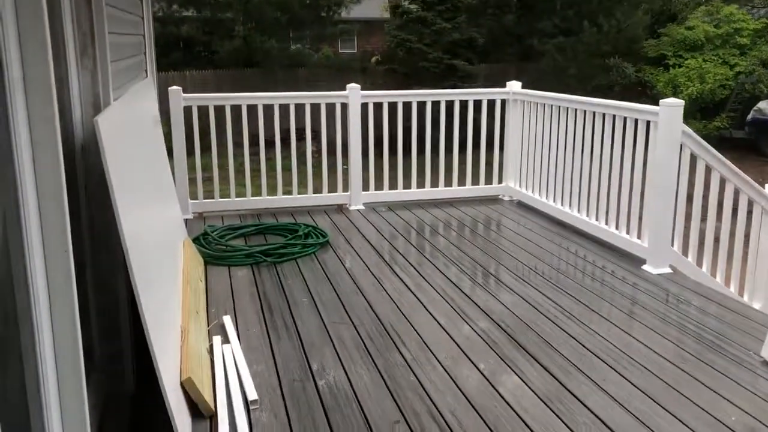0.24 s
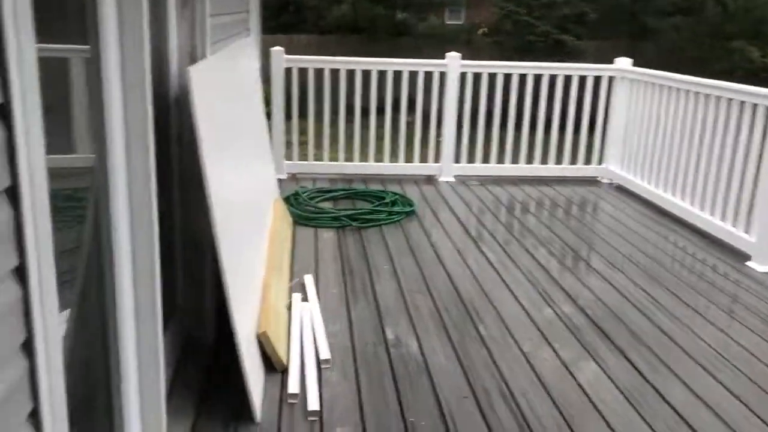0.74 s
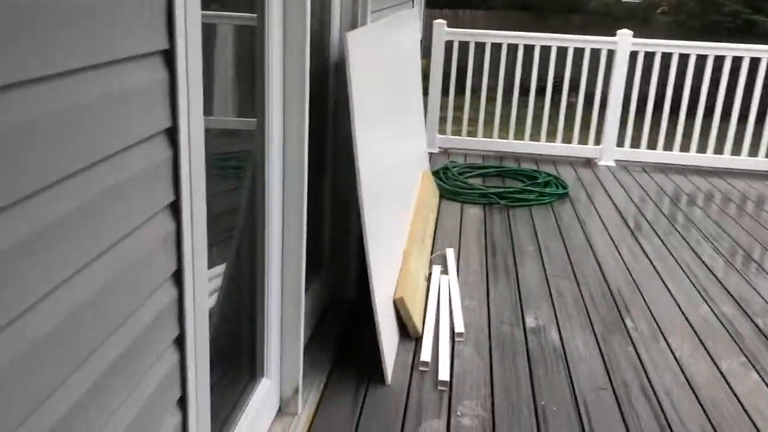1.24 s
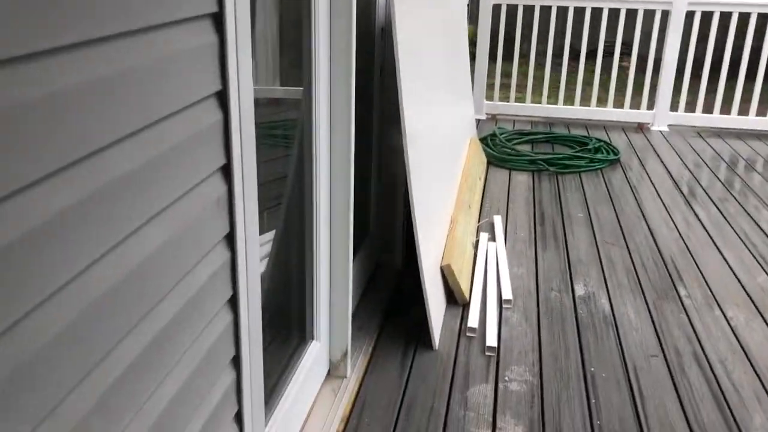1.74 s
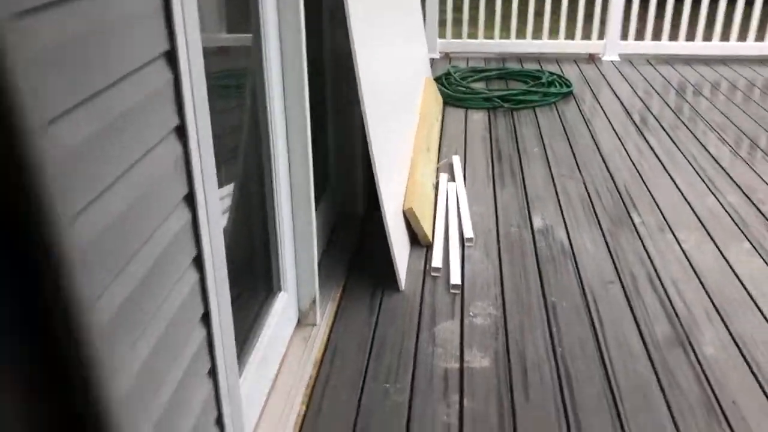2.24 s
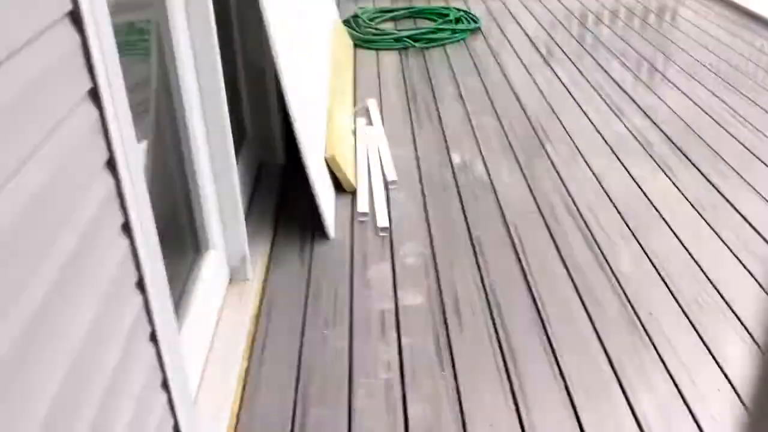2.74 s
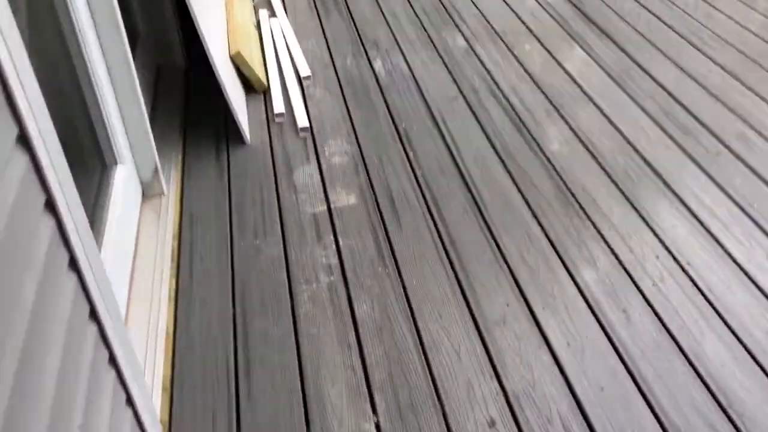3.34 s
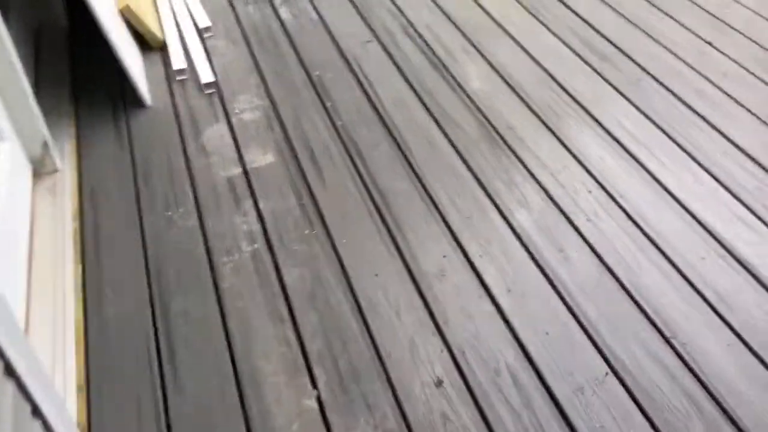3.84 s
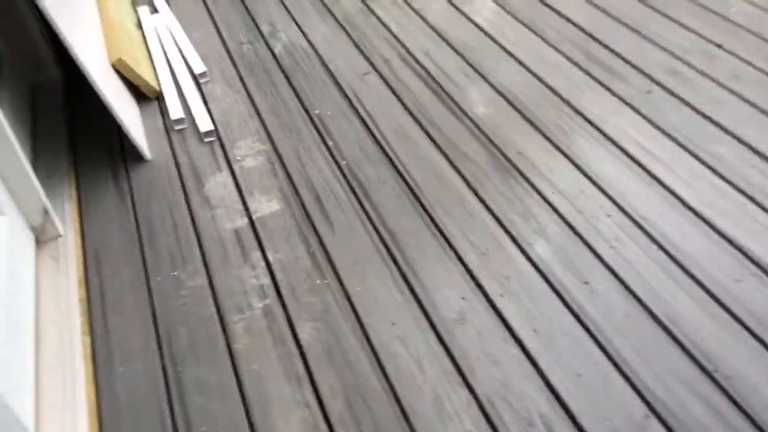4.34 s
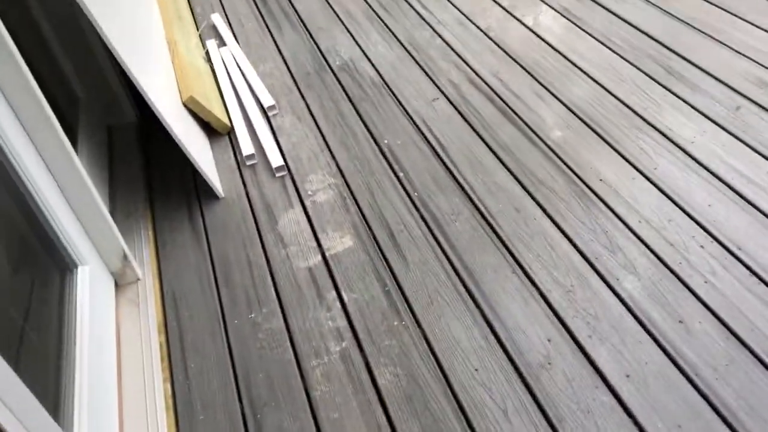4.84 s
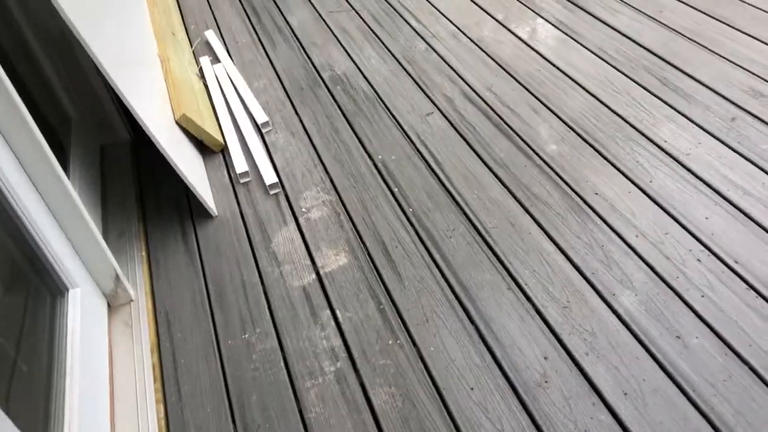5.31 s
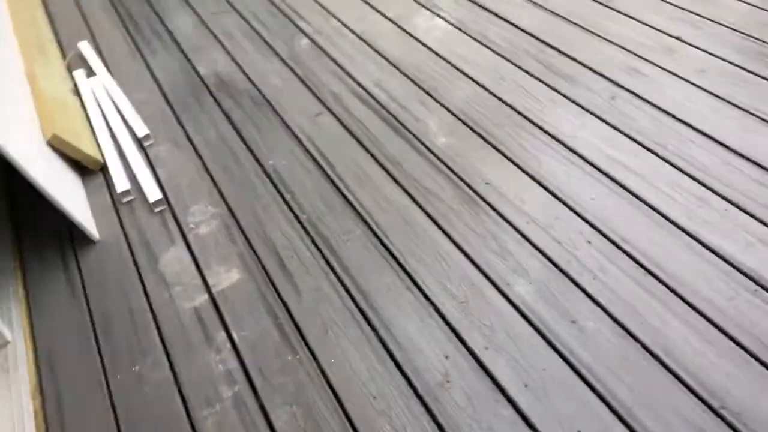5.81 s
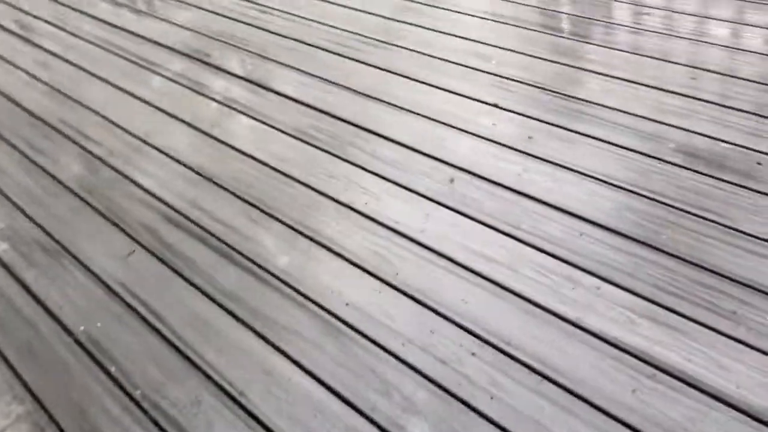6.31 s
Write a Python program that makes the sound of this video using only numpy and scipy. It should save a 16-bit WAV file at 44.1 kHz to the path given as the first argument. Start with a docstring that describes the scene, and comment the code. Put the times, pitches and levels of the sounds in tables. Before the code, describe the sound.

A sliding glass door cracks off its latch, booms, rumbles along its track and squeals to a stop; then a bird clucks in a quiet yard.

```python
"""Shoes scuff and clothes rustle by the phone over a quiet suburban yard, with small clicks from a glass patio door.
Cracks and thumps then ring the panel as the door is pulled off its latch: short noise bursts and decaying sines.
It rumbles open on its rollers (filtered impact grains) and squeals as it slows (unsteady tones with overtones).
A bird outside gives ten clucks from paired gliding voices; a farther one whistles thinly.
Traffic murmur and leaves are shaped noise."""
import sys
import numpy as np
from scipy import signal
from scipy.fft import rfft, irfft
from scipy.io import wavfile
from scipy.ndimage import uniform_filter1d

SR = 44100
rng = np.random.default_rng(int(sys.argv[2]) if len(sys.argv) > 2 else 0)


def dump_mix(stems):
    """Bounce the given channels to the path in sys.argv[1] as a 16-bit WAV at rate SR."""
    frames = np.atleast_2d(stems).T  # one column per channel
    limited = np.clip(frames, -1, 1)  # hard clip at full scale
    pcm = np.round(limited * 32767).astype(np.int16)
    wavfile.write(sys.argv[1], SR, pcm)


N = 289464
T = np.arange(N) / SR  # time of each sample [s]

# Levels in the tables are relative: each source is balanced again in its own mix.
# latch and frame snapping: (time [s], level [dB], pitch of the contact [Hz])
SNAPS = [(1.134, -23.5, 2010), (1.137, -19, 4520), (1.141, -14.5, 4720), (1.146, -24, 2200),
         (1.15, -5, 1775), (1.152, -19, 4540), (1.17, -26.5, 1750), (1.189, -44, 4600), (1.1935, -21, 4100),
         (1.3170, -22, 3050), (1.331, -27.5, 3560), (1.347, -29, 2930)]
# jolts of the heavy panel: (time [s], level [dB])
THUMPS = [(1.1371, -17.5), (1.1507, -19), (1.1698, -21.5), (1.3140, -20), (1.3240, -22), (1.378, -31.5),
          (1.725, -36.5)]
# colour of the latch cracks: (frequency [Hz], level [dB])
CRACK_SPECTRUM = [(150, -19), (500, -5), (1200, 2), (1550, 3), (1800, 3), (2200, -5), (4500, -2),
                  (7000, -7), (11000, -12), (16000, -23.5)]
# modes of the glazed panel: (frequency [Hz], level [dB], 60 dB decay time [s])
PANEL_MODES = [(83.3, -20, 0.73), (138.4, -5.5, 0.51), (158.9, -17.5, 1), (194.4, -4, 0.14),
               (215, 3, 0.099), (257.4, -3, 0.11), (318.6, -11.5, 0.19), (656, -15, 0.14), (986, -31, 0.16),
               (1203, -23, 0.32), (1780, -29, 0.45)]
# ring of the room behind the door: (frequency [Hz], level [dB])
ROOM_SPECTRUM = [(59, -31), (100, -9), (200, 0), (425, -15.5), (674, -12.5), (814, -15), (962, -12),
                 (1770, -15), (2420, -21.5), (4940, -24), (15000, -45.5)]
# rumble following the door's speed, a quick shove, a long coast, a stop: (time [s], level [dB])
ROLL_CURVE = [(1.82, -54.5), (1.98, -44), (2.189, -28.5), (2.48, -29), (2.9, -37.5), (3.15, -46),
              (3.43, -44.5), (3.569, -56.5)]
# colour of the rolling panel: (frequency [Hz], level [dB])
RUMBLE_SPECTRUM = [(21, -48), (35, -11), (70, 1.5), (125, -3), (169, 0), (221, -0.5), (271, 1), (443, -5),
                   (491, -1), (543, -7.5), (918, -9.5), (1220, -15), (2000, -23), (2600, -62), (4400, -120)]
# colour of the grit in the track: (frequency [Hz], level [dB])
GRIT_SPECTRUM = [(900, 4.5), (1600, 2), (2600, 2), (4500, -2.5), (7000, -10.5), (10000, -16),
                 (15500, -19.5)]
# rollers dropping over bumps in the track: (time [s], level [dB])
BUMPS = [(1.867, -38), (1.965, -28), (1.987, -21), (2.068, -23), (2.183, -17), (2.209, -32)]
# squeal of the slowing door, before hops and judder: (time [s], pitch [Hz], level [dB])
SQUEAL_CURVE = [(2.819, 2880, -43.5), (2.899, 3265, -36.5), (2.985, 3330, -36), (3.003, 3040, -35.5),
                (3.125, 3094, -35.5), (3.148, 3565, -37.5), (3.2, 3814, -37), (3.249, 3930, -41.5),
                (3.267, 4600, -46.5), (3.355, 4260, -44), (3.41, 3450, -34), (3.476, 2360, -48)]
# brief squeaks, before judder: (time [s], length [s], start pitch [Hz], end pitch [Hz], level [dB])
SQUEAKS = [(2.214, 0.077, 3250, 6540, -43), (2.285, 0.1, 6330, 4660, -40.5),
           (2.364, 0.076, 4380, 7060, -42), (2.59, 0.039, 3660, 6240, -40.5),
           (2.699, 0.075, 5700, 6200, -52.5), (3.473, 0.056, 3860, 2650, -46)]
# small clicks of handle, latch and track: (time [s], level [dB], centre [Hz])
TICKS = [(0.742, -39.5, 6200), (0.8248, -36, 2980), (.8471, -36, 4670), (0.861, -30, 4330),
         (.875, -44, 4670), (1.02, -35, 8200), (1.045, -36.5, 3160), (1.6403, -45.5, 6560),
         (1.793, -38, 6250), (2.2225, -21.5, 2810), (2.4907, -25.5, 4220), (2.6343, -27.5, 4520),
         (2.7284, -25, 3970), (2.859, -33, 4070), (3.3083, -24, 2820), (4.191, -47, 5460),
         (4.1978, -37, 5920), (5.3125, -43, 5900), (5.537, -34, 2600), (6.1047, -39, 3820),
         (6.117, -31.5, 2300), (6.2477, -35, 1080)]
# bird clucks: (time [s], top of the high voice before its shake [Hz], level [dB])
CLUCKS = [(4.108, 3230, -62.5), (4.263, 3600, -56.5), (4.400, 3570, -51.5), (4.529, 3700, -50.5),
          (4.646, 3620, -47.5), (4.767, 3450, -48), (4.902, 3590, -48), (5.039, 3670, -50),
          (5.184, 3700, -49), (5.338, 3590, -51.5)]
# noisy edge of a cluck, with the phone's own harsh ring near 13 kHz: (frequency [Hz], level [dB])
RASP_SPECTRUM = [(2000, 2), (2800, 4.5), (4500, -6.5), (7000, -15), (10500, -38), (12900, -13),
                 (14500, -21)]
# thin whistles of a farther bird: (time [s], length [s], start pitch [Hz], end pitch [Hz], level [dB])
WHISTLES = [(4.36, 0.37, 3890, 3770, -65), (4.42, .2, 6590, 6460, -72), (4.973, 0.1, 3800, 3950, -62),
            (5.032, 0.029, 4360, 4640, -53.5), (5.002, 0.036, 8460, 8780, -61.5),
            (5.066, 0.19, 6480, 6250, -71)]
# movements by the phone: (time [s], rise [s], hold [s], scuff level [dB], cloth hiss level [dB])
MOVES = [(-.16, 0.18, 0.034, -45.5, -62), (0.571, 0.033, 0.21, -50.5, -64),
         (0.843, .015, 0.022, -44.5, -77), (0.965, 0.027, 0.097, -58, -73), (4.72, 0.11, 0.31, -65, -69.5),
         (5.336, 0.12, 0.16, -43, -63), (5.906, 0.017, 0.12, -58, -54.5), (6.076, 0.027, 0.06, -57, -64),
         (6.24, 0.0046, .04, -54, -69), (6.36, .02, 0.21, -56, -67)]
# colour of the shoe scuffs: (frequency [Hz], level [dB])
SCUFF_SPECTRUM = [(47, -30), (80, -11), (188, 1), (255, -4), (285, 2), (355, -6.5), (627, -7), (684, -10.5),
                  (833, -7.5), (1720, -14.5), (1960, -18.5), (2180, -20), (4500, -22.5), (15000, -47)]
# colour of the sliding fabric: (frequency [Hz], level [dB])
CLOTH_SPECTRUM = [(1500, -15), (3000, -1.5), (5000, -2), (7500, -3), (12000, -9.5), (15500, -12)]
# weight shifting on the boards: (time [s], level [dB], pitch [Hz])
FOOTFALLS = [(.694, -31.5, 236), (0.739, -32.5, 208), (.882, -34.5, 170), (5.451, -40, 280),
             (5.794, -36.5, 216), (5.904, -35, 199)]
# rubbing strokes of sole and sleeve, and one rasp of the door on its track:
# (time [s], length [s], resonance [Hz], sharpness [Q], level [dB])
RUBS = [(0, 0.093, 610, 5, -47), (0.12, 0.16, 640, 3.4, -60.5), (2.165, 0.14, 3360, 1.2, -46.5),
        (5.326, 0.38, 4650, 1.9, -57)]
# colour of the open yard: (frequency [Hz], level [dB])
YARD_SPECTRUM = [(15, -4), (25, -16.5), (71, -1.5), (122, -5), (204, -5.5), (246, -7.5), (331, -15),
                 (368, -12.5), (469, -13), (631, -11.5), (684, -12.5), (1080, -9.5), (1950, -20),
                 (5010, -31), (15500, -54.5)]
# the open air as the phone leans out of the doorway: (time [s], level [dB])
OPEN_AIR_CURVE = [(0, -5), (.5, -8.5), (1.699, -4), (3.6, -0.5), (5.801, 1), (6.56, -3.5)]

# drumming: level against the rumble [dB], and its fade as the door travels [dB/s]
DRUM_DB, DRUM_FADE_DB_PER_S = -1.5, 11
# grit: relative level at full speed [dB], and its change per dB of rumble
GRIT_DB, GRIT_FOLLOW = -46, 0.59
# judder scale, as a share of the pitch, at a reference pitch [Hz]; higher squeals hold steadier
JUDDER, JUDDER_AT_HZ, JUDDER_POWER = 0.01406, 3100, 2.49
# pitch hops up or down, as a share at the same reference pitch, and rate of fresh draws [1/s]
HOP, HOPS_PER_S = 0.0162, 70
# a second, scraping contact: judder scale as a share, and level against the squeal [dB]
FRAY, FRAY_DB = .06, -11
# stray clicks: average rate [1/s], relative level [dB], centre [Hz]
FAINT_TICKS_PER_S, FAINT_TICK_DB, FAINT_TICK_HZ = 3, -45, 6000
# loudest cluck: length [s] and top of its low voice [Hz]; softer clucks are shorter, their low voice lower
CLUCK_S, LOW_VOICE_HZ = .063, 2312
CLUCK_S_PER_DB, LOW_VOICE_HZ_PER_DB = .001, 17
WALL_S, WALL_DB = 0.023, -6.5  # slap of the house wall: delay [s], level before the echo mix [dB]
# movement: depth of the swell [dB], loss during the hold [dB], fall time per rise time
MOVE_RANGE_DB, MOVE_SAG_DB, MOVE_FALL = 19, 4, 1.65
YARD_DB = -51  # yard noise before the murmur and open-air changes [dB]
# far traffic: level against the yard noise [dB], and its one swell: centre [s], width [s], height [dB]
MURMUR_DB, SWELL_AT_S, SWELL_WIDTH_S, SWELL_DB = -1.5, 4.5, 0.62, 5.5
HISS_DB = -77  # steady microphone hiss, before the phone's filters [dB]
TOP_HZ = 15850  # top of the phone's range [Hz]


def undb(db):
    """Decibels to gain."""
    return 10 ** (np.asarray(db) / 20)


def unit(x):
    """Scale to rms 1."""
    return x / np.sqrt(np.mean(x ** 2))


def add(out, s, x):
    """Mix x into out from time s."""
    i = int(s * SR)
    out[i:i + len(x)] += x[:max(N - i, 0)]


def fader(s, db):
    """Gain along a level curve, closed softly outside it."""
    curve_db = np.interp(T, s, db, left=-150, right=-150)
    return uniform_filter1d(undb(curve_db), size=400)


def colour(x, points):
    """Causal minimum-phase filter with the given (Hz, dB) spectrum, rolled off beyond both ends."""
    hz, db = np.transpose(points)
    size = 8192
    f = np.maximum(np.arange(size // 2 + 1) * SR / size, 1)
    octaves_below = np.log2(hz[0] / f).clip(0, 2)
    octaves_above = np.maximum(np.log2(f / hz[-1]), 0)
    level_db = np.interp(np.log(f), np.log(hz), db) - 24 * octaves_below - 24 * octaves_above
    # folding the cepstrum puts the filter's energy as early as it can be
    cepstrum = irfft(np.log(undb(level_db)))
    cepstrum[1:size // 2] *= 2
    cepstrum[size // 2 + 1:] = 0
    impulse = irfft(np.exp(rfft(cepstrum)))
    return signal.fftconvolve(x, impulse)[:len(x)]


def resonance(x, hz, q):
    """One resonance, gain 1 at its centre."""
    b, a = signal.iirpeak(min(hz, SR / 3), max(q, 1), fs=SR)
    return signal.lfilter(b, a, x)


def butter(x, order, hz, kind="low"):
    """Forward Butterworth filter."""
    return signal.sosfilt(signal.butter(order, hz, kind, fs=SR, output="sos"), x)


def walk(rate):
    """Smooth random wander with fresh draws at the given rate, spread near 1."""
    k = max(int(SR / rate), 2)
    steps = np.repeat(rng.standard_normal(N // k + 1), k)
    return unit(uniform_filter1d(steps, k)[:N])


def grains(rate, spread_db):
    """Dense tiny impacts of uneven size, rms 1."""
    size = undb(spread_db * np.minimum(rng.exponential(size=N), 5))
    hits = rng.random(N) < rate / SR
    return unit(hits * size * rng.standard_normal(N))


def fade(t, t60):
    """Exponential ring-down, 60 dB in t60 seconds."""
    return np.exp(-np.log(1000) * t / t60)


def echo(x, t60, delay):
    """Diffuse reflections of x through a decaying noise tail of unit energy."""
    t = T[:SR]
    tail = rng.standard_normal(SR) * fade(t, t60) * (t > delay)
    return signal.fftconvolve(x, tail / np.linalg.norm(tail))[:N]


def contact(hz, t60, q, broad, tone):
    """A short burst of crowded modes, with one clear mode at hz."""
    t = T[:SR // 10]
    noise = rng.standard_normal(len(t))
    crowd = unit(resonance(noise, hz, q) + broad * noise)
    burst = (crowd + tone * np.sin(2 * np.pi * hz * t)) * fade(t, t60)
    # energy grows with ring time
    return burst / np.linalg.norm(burst) * np.sqrt(t60 * SR / 100)


def knocks():
    """The latch lets go in a cluster of cracks; the glazed panel booms and the room rings on."""
    cracks, pushes, t = np.zeros(N), np.zeros(N), T[:SR]
    for s, crack_db, hz in SNAPS:
        add(cracks, s, undb(crack_db) * contact(hz, t60=0.024, q=2.9, broad=0.69, tone=0.43))
    for s, thump_db in THUMPS:
        add(pushes, s, undb([thump_db]))
    ring = sum(undb(db) * np.cos(2 * np.pi * hz * t) * fade(t, t60) for hz, db, t60 in PANEL_MODES)
    soft_onset = 1 - np.exp(-t / 0.0022)
    boom = undb(-4.5) * signal.fftconvolve(pushes, ring * soft_onset)[:N]
    boom = boom + undb(-9.5) * echo(boom, t60=.75, delay=.02)
    # loose glass and screen keep chattering, so the tail is ever-changing
    chatter_decay = fade(t, t60=0.53) * (t > .006)
    chatter_power = np.abs(signal.fftconvolve(cracks ** 2, chatter_decay)[:N]) / SR
    chatter_noise = unit(colour(grains(rate=6000, spread_db=0.5), ROOM_SPECTRUM))
    chatter = undb(8.5) * np.sqrt(chatter_power) * chatter_noise
    room = undb(14) * colour(echo(cracks, t60=1.0, delay=0.002), ROOM_SPECTRUM)
    return undb(10.5) * colour(cracks, CRACK_SPECTRUM) + boom + chatter + room


def rollers():
    """Rollers rattle the panel over a gritty track; the heavy glass drums underneath."""
    s, rumble_db = np.transpose(ROLL_CURVE)
    deep_db = rumble_db + DRUM_DB - DRUM_FADE_DB_PER_S * (s - s[0])
    grit_db = GRIT_DB + GRIT_FOLLOW * (rumble_db - rumble_db.max())
    shake = colour(grains(rate=6000, spread_db=1.5), RUMBLE_SPECTRUM) * undb(.6 * walk(40))
    deep = unit(butter(shake, 4, 125))
    light = unit(butter(shake, 4, 160, "high"))
    grit = unit(colour(grains(rate=5000, spread_db=2.8), GRIT_SPECTRUM))
    grit = grit * undb(1.5 * walk(90) + 1.2 * walk(22))
    # each bump rings the lowest panel mode
    bumps, t = np.zeros(N), T[:SR // 2]
    for at, db in BUMPS:
        add(bumps, at, undb(db) * np.sin(2 * np.pi * PANEL_MODES[0][0] * t) * fade(t, t60=0.17))
    return (light * fader(s, rumble_db) + undb(-2.5) * deep * fader(s, deep_db)
            + undb(3.0) * grit * fader(s, grit_db) + undb(-4.5) * bumps)


def stick_slip(hz, jitter, second_db, third_db, fourth_db):
    """An unsteady friction tone with three overtones that come and go; fast flutter frays each into a scrape."""
    judder = jitter * (.9 * walk(150) + 1.2 * walk(1100))
    phase = 2 * np.pi * np.cumsum(hz * (1 + judder)) / SR
    flutter = undb(2.5 * walk(140))
    tone = np.zeros(N)
    for k, db in enumerate((0, second_db, third_db, fourth_db), 1):
        level = undb(db + 1.3 * k * walk(80))
        fray = 1 + .13 * k * walk(1500)
        in_range = k * hz < TOP_HZ
        tone += level * fray * np.sin(k * phase) * in_range
    return flutter * tone


def squeal():
    """The runner catches in short squeaks, then sings and scrapes as the door slows."""
    s, hz, db = np.transpose(SQUEAL_CURVE)
    note = np.interp(T, s, hz)
    unrest = (JUDDER_AT_HZ / note) ** JUDDER_POWER
    note = note * (1 + HOP * unrest * np.sign(walk(HOPS_PER_S)))  # the pitch catches and hops
    clear = stick_slip(note, JUDDER * unrest, second_db=-13, third_db=-27, fourth_db=-34)
    scrape = stick_slip(note, FRAY, second_db=-15.5, third_db=-23, fourth_db=-36)
    song = (clear + undb(FRAY_DB) * scrape) * fader(s, db)
    # the metal track favours the overtones that cross its ring
    song = song + undb(4.5) * resonance(song, hz=8550, q=5.7)
    pitch, gain = np.full(N, hz[0]), np.zeros(N)
    for at, length, start_hz, end_hz, level_db in SQUEAKS:
        glide = np.interp(T, [at, at + length], [start_hz, end_hz])
        pitch = np.where(T >= at, glide, pitch)
        gain = np.maximum(gain, fader([at, at + length], [level_db, level_db]))
    squeaks = gain * stick_slip(pitch, jitter=.04, second_db=-22, third_db=-32, fourth_db=-35)
    direct = song + squeaks
    return direct + undb(-12) * echo(direct, t60=.4, delay=.005)


def ticks():
    """Light clicks of loose metal and plastic, with randomly timed strays among them."""
    out = np.zeros(N)
    for s, db, hz in TICKS:
        add(out, s, undb(db) * contact(hz, t60=0.019, q=2.8, broad=0.033, tone=0.69))
    strays = (rng.random(N) < FAINT_TICKS_PER_S / SR) * rng.uniform(0.71, 1, N)
    stray_click = contact(FAINT_TICK_HZ, t60=0.016, q=1.4, broad=0.45, tone=.3)
    out += undb(FAINT_TICK_DB) * signal.fftconvolve(strays, stray_click)[:N]
    return out + undb(-8.0) * echo(out, t60=1.0, delay=0.0038)


def bird():
    """Both sides of the syrinx sound at once, each in its own arch, with a rasp; house and trees echo the cluck."""
    out, effort = np.zeros(N), np.zeros(N)
    loudest_db = max(db for _, _, db in CLUCKS)
    for s, high_hz, db in CLUCKS:
        length = CLUCK_S + CLUCK_S_PER_DB * (db - loudest_db)
        low_hz = LOW_VOICE_HZ + LOW_VOICE_HZ_PER_DB * (db - loudest_db)
        u = np.linspace(0, 1, int(length * SR))  # progress through the cluck
        swell = undb(db) * np.abs(np.sin(np.pi * u)) ** .65
        add(effort, s, swell)
        for top_hz, sag, crest, voice_db in ((low_hz, .6, .36, 1), (high_hz, 1.6, .45, -3)):
            arch = 1 - sag * (u - crest) ** 2
            hz = top_hz * arch * (1 + .012 * walk(700)[:len(u)])
            shake = undb(3 * walk(160)[:len(u)])
            voice = np.sin(2 * np.pi * np.cumsum(hz) / SR)
            add(out, s, undb(voice_db) * shake * swell * voice)
    # the rasp carries the phone's harsh ring as well as the noisy edge
    rasp = unit(colour(rng.standard_normal(N), RASP_SPECTRUM))
    out = out + undb(3.5) * resonance(out, hz=3170, q=15.3) + undb(-5.5) * effort * rasp
    walls = undb(-8) * echo(out, t60=.22, delay=.01)
    add(walls, WALL_S, undb(WALL_DB) * out)
    return undb(-.5) * (out + walls)


def gesture(s, rise, hold, db):
    """Gain of one movement: it swells, sags a little while it lasts, and dies away."""
    times = s + np.cumsum([0, rise, hold, MOVE_FALL * rise])
    return fader(times, db - np.array([MOVE_RANGE_DB, 0, MOVE_SAG_DB, MOVE_RANGE_DB]))


def movement():
    """Shoes scuff and fabric slides in fine grains."""
    scuff = unit(colour(grains(rate=5000, spread_db=1.5), SCUFF_SPECTRUM)) * undb(1.9 * walk(25))
    cloth = unit(colour(grains(rate=8400, spread_db=0.0), CLOTH_SPECTRUM)) * undb(1.0 * walk(40))
    out = np.zeros(N)
    for s, rise, hold, scuff_db, cloth_db in MOVES:
        out += scuff * gesture(s, rise, hold, scuff_db)
        out += cloth * gesture(s, rise, hold, cloth_db)
    return out


def footfalls():
    """Soft weight shifts thud on the boards as short, pitched bursts."""
    out = np.zeros(N)
    for s, db, hz in FOOTFALLS:
        add(out, s, undb(db) * contact(hz, t60=0.072, q=12.0, broad=0, tone=0.93))
    return out


def rubs():
    """Sole and sleeve rub and the door rasps once on its track: fine grains, each stroke through a resonance twice."""
    out = np.zeros(N)
    for s, length, hz, q, db in RUBS:
        rough = grains(rate=6200, spread_db=1.5)
        stroke = unit(resonance(resonance(rough, hz, q), hz, q))
        times = [s, s + length / 3, s + 2 * length / 3, s + length]
        out += stroke * fader(times, [db - 5, db, db, db - 7.5])
    return out


def far_bird():
    """Faint gliding whistles, blurred by distance into a diffuse echo."""
    out = np.zeros(N)
    for s, length, start_hz, end_hz, db in WHISTLES:
        hz = np.linspace(start_hz, end_hz, int(length * SR))
        whistle = np.hanning(len(hz)) * np.sin(2 * np.pi * np.cumsum(hz) / SR)
        add(out, s, undb(db) * whistle)
    return out + echo(out, t60=0.28, delay=0.0052)


def yard():
    """A low murmur of far traffic that swells once, and leaves that grow clearer in the open doorway."""
    s, air_db = np.transpose(OPEN_AIR_CURVE)
    murmur_db = MURMUR_DB + SWELL_DB * np.exp(-((T - SWELL_AT_S) / SWELL_WIDTH_S) ** 2)
    air = undb(YARD_DB) * unit(colour(rng.standard_normal(N), YARD_SPECTRUM))
    # zero-phase split, so the leaves are what remains above the murmur
    bass = signal.sosfiltfilt(signal.butter(4, 220, fs=SR, output="sos"), air)
    leaves = air - bass
    throb_db, gust_db = 1.2 * walk(9), .5 * walk(4)
    return bass * undb(murmur_db + throb_db) + leaves * undb(np.interp(T, s, air_db) + gust_db)


def scene():
    """Everything at the one microphone."""
    door = knocks() + rollers() + squeal() + ticks()
    strokes_and_steps = movement() + footfalls() + rubs()
    hiss = undb(HISS_DB) * rng.standard_normal(N)
    return (door + bird() + strokes_and_steps + far_bird() + yard() + hiss)[None]


def record(dry):
    """The phone drops the deepest bass and cuts the top."""
    thin = butter(dry, 6, 41, "high")
    return signal.sosfilt(signal.ellip(10, .2, 70, TOP_HZ, fs=SR, output="sos"), thin)


dry = scene()
out = record(dry)
dump_mix(out)
```